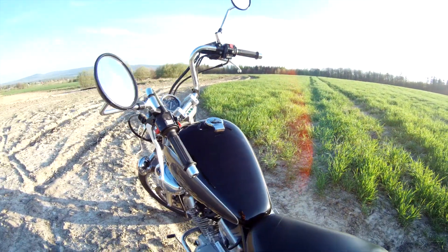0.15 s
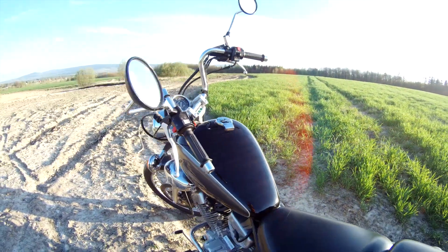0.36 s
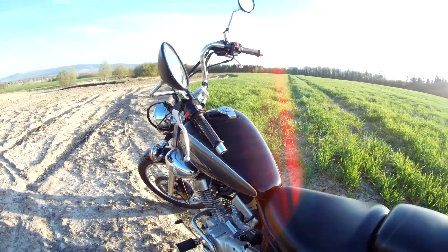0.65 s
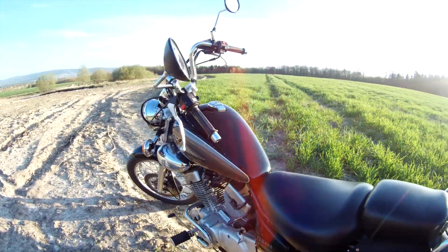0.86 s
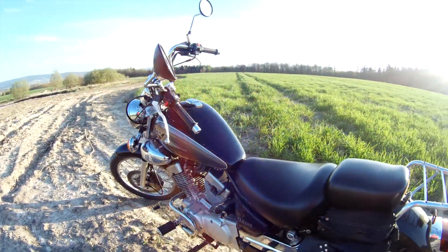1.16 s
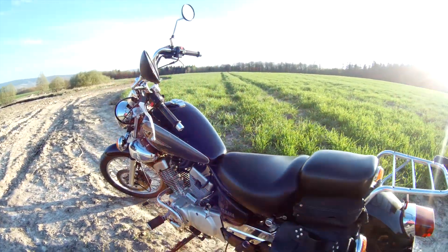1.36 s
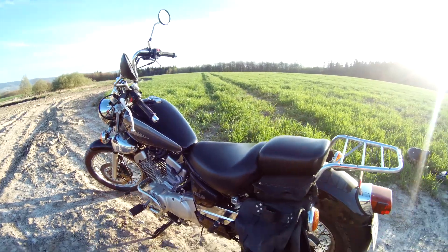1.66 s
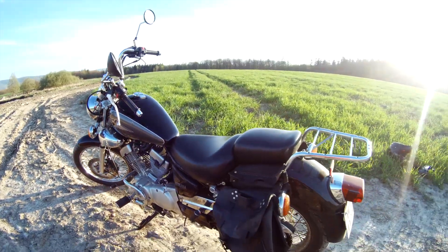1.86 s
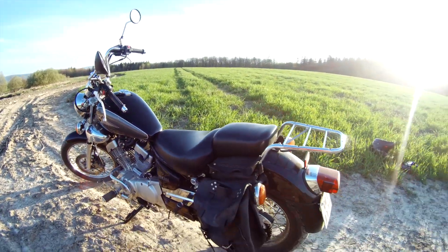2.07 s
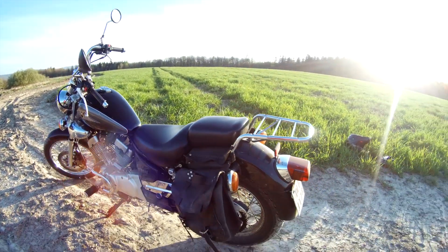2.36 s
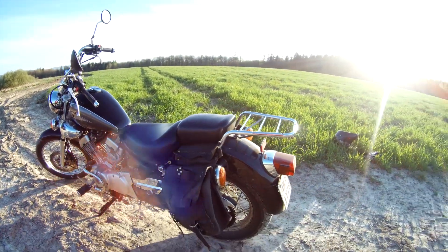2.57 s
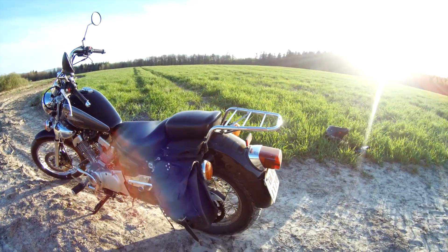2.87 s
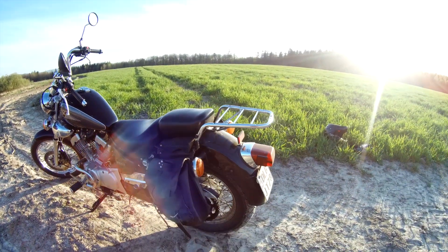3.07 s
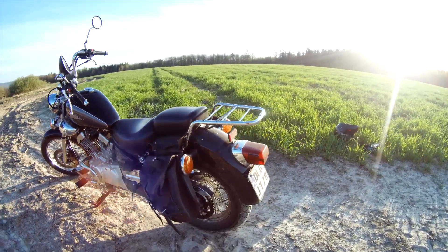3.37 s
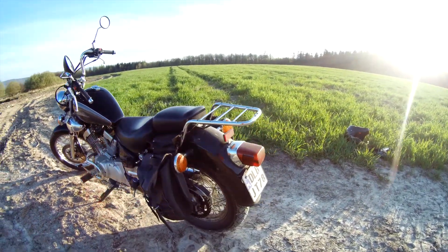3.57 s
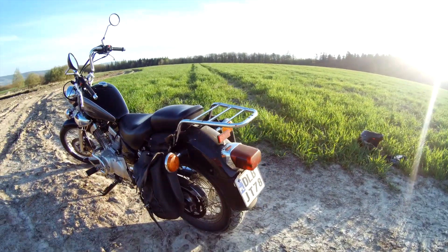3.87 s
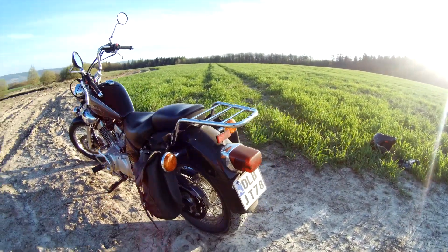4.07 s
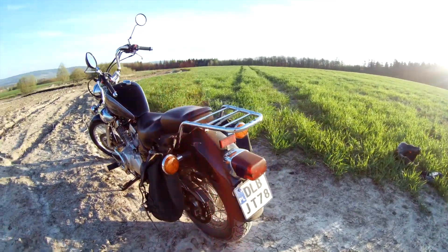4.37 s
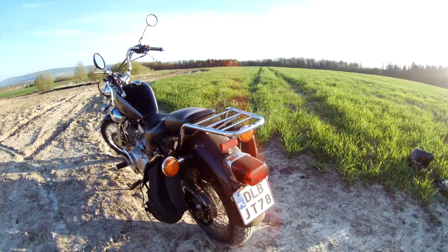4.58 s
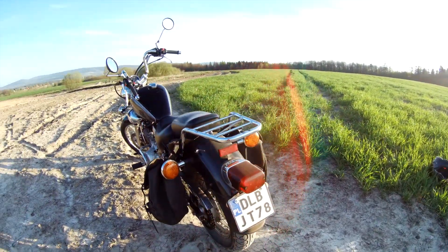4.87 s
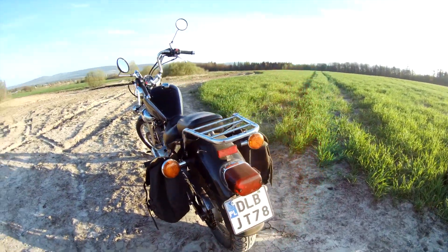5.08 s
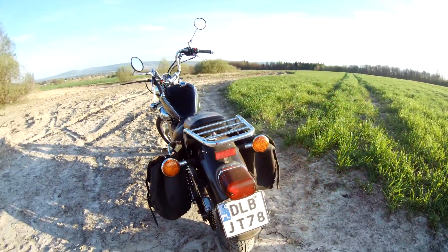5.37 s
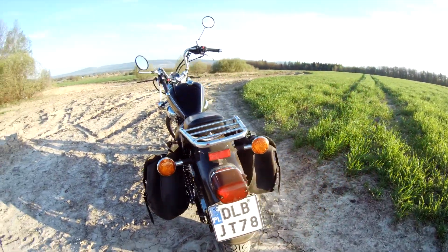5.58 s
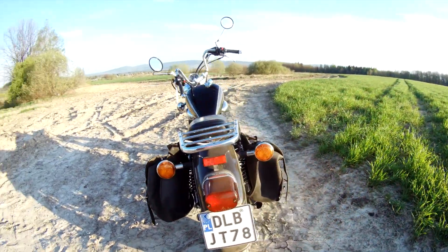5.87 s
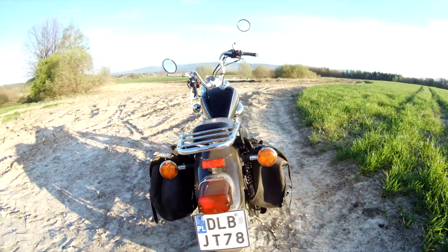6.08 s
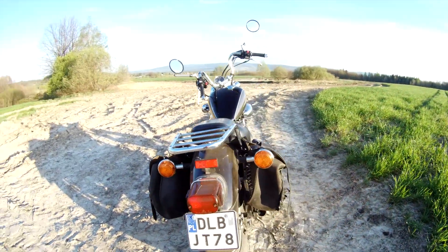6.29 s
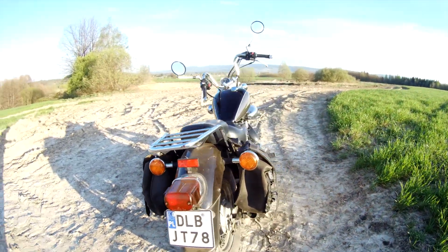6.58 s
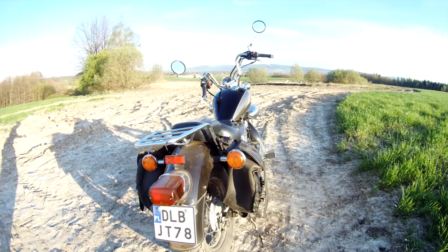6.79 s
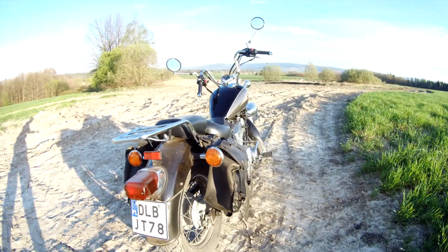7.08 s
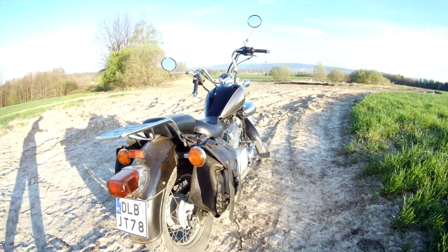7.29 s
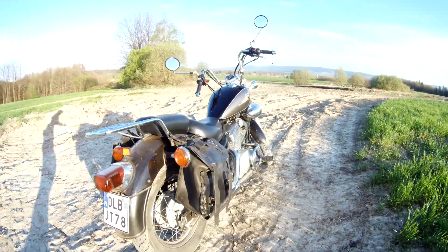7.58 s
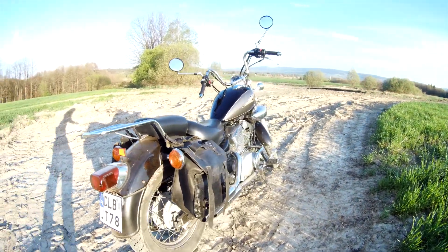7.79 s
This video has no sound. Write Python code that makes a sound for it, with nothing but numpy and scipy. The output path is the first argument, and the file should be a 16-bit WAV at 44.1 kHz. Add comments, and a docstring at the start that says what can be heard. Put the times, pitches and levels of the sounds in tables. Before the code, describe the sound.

A small air-cooled twin-cylinder motorcycle idles steadily on an open dirt track. Low exhaust puffs boom in a limping rhythm beneath hard block knocks, gear churn and a hissing cam-chain rustle. The close, moving mono microphone starts beside the engine and walks round to the tail, where knocks and mechanical noise soften and the pipe's puffing and silencer buzz stand out. Idle speed wavers slightly upwards. Dry open air, no reverberation.

```python
"""The exhaust of a small air-cooled V-twin motorcycle booms as the cold engine idles on a dirt track:
two unevenly spaced puffs a cycle ring the silencers, one early puff nearly fails, and the speed slowly wavers upwards.
Jolts ring the silencer shells; firings knock and drone in the engine's castings over churning gears.
Above lie the rustling cam chain, sizzling valve springs, clacking covers and clicking rockers.
The listener walks from the flank round the tail, so each part swells or fades with direction and distance."""
import sys
import numpy as np
from scipy import signal
from scipy.fft import rfft, irfft, next_fast_len
from scipy.io import wavfile

SR = 44100
rng = np.random.default_rng(int(sys.argv[2]) if len(sys.argv) > 2 else 0)


def dump_mix(stems):
    """Bounce the given channels to the path in sys.argv[1] as a 16-bit WAV at rate SR."""
    frames = np.atleast_2d(stems).T  # one column per channel
    limited = np.clip(frames, -1, 1)  # hard clip at full scale
    pcm = np.round(limited * 32767).astype(np.int16)
    wavfile.write(sys.argv[1], SR, pcm)


N = 349713

# crankshaft speed: (time [s], speed [rpm])
SPEED = [(0, 1087), (0.17, 1058), (1.28, 1087), (1.38, 1113), (2.29, 1117), (2.66, 1225), (2.96, 1177),
         (3.38, 1229), (3.74, 1192), (4.0, 1274), (4.44, 1155), (4.71, 1231), (5.42, 1276), (6.57, 1239),
         (6.81, 1301), (7.31, 1277), (7.53, 1350), (7.93, 1230)]
# the listener's walk; the tail lies at 90 degrees: (time [s], direction from the flank [degrees], distance [m])
WALK = [(0, 3.3, 1.24), (1.5, 22, 1.28), (3, 33.3, 1.68), (4.2, 56.7, 1.776), (5.9, 90, 1.53),
        (7, 106.7, 1.54), (7.93, 118.7, 1.515)]
# directions round the motorcycle at which block and drone levels are given [degrees]
ANGLES = (8, 27, 45, 75, 112)

# silencer modes of each cylinder: (frequency [Hz], width [Hz], signed strength)
FIRST_PIPE = [(36.5, 10.5, -13), (108.4, 43.1, -17), (106.9, 22.43, 40), (142.2, 41, 2.5)]
SECOND_PIPE = [(45, 11.8, -9), (81.7, 87.3, -6.5), (91.7, 15.3, 12.5), (119.3, 111.4, 4)]
# short pop at the tailpipe's mouth: (frequency [Hz], width [Hz], signed strength)
MOUTH = [(210, 120, -1)]
# exhaust blowdown of the first and second cylinder: (share of the cycle, share of the cycle)
BLOWDOWN = (.519, -.036)
# silencer shell modes: (frequency [Hz], width [Hz], relative level [dB])
SHELL = [(487, 45, -0.5), (538.3, 24.3, 2), (597, 45, 0), (658.6, 38, 1), (698, 69, -8), (803, 18, -12.5)]
# usual jolts of the rocking engine: (share of the cycle, level against the shell beam [dB], favoured pitch [Hz])
SHELL_SHAKE = [(.235, 10.5, 567), (.48, 7.5, 642), (.66, 6, 511), (.89, 5, 616)]
# single shell jolts at set times: (time [s], relative peak [dB], favoured pitch [Hz])
JOLTS = [(4.349, -18.5, 640), (4.911, -21, 480.1), (5.104, -21, 545), (5.485, -23.5, 553.3),
         (6.054, -23, 545), (7.483, -30, 510.9)]

# firing of the first and second cylinder: (share of the cycle, share of the cycle)
FIRING = (0.335, 0.785)
# single hard, dry knocks: (time [s], relative peak [dB], favoured pitch [Hz])
KNOCKS = [(0.035, -16, 907), (0.15, -15.5, 884), (0.264, -17, 1000), (0.379, -14.5, 925),
          (0.49, -13.5, 965), (0.604, -22, 950), (0.716, -13, 970), (0.828, -19.5, 956), (0.937, -15, 1050),
          (1.05, -19, 1050), (1.161, -13.5, 960), (1.273, -12.5, 960), (1.383, -21.5, 970),
          (1.487, -18.5, 1010), (1.699, -18, 1053), (2.028, -18, 1015), (2.348, -16.5, 910),
          (2.452, -23, 900), (2.557, -20.5, 1050), (2.754, -19.5, 960), (2.952, -20.5, 980),
          (3.056, -18.5, 1068), (3.255, -19, 1038), (3.643, -23, 1068), (3.748, -22, 1040),
          (3.834, -20, 975), (4.643, -19.5, 1000), (4.741, -22, 923.6), (5.122, -23.5, 921),
          (5.221, -24, 1380), (5.506, -25, 1047), (5.69, -22, 1038), (5.79, -26, 1383), (5.883, -24, 1035),
          (7.487, -19.5, 962), (7.854, -20, 955)]
# engine block modes: (frequency [Hz], width [Hz], extra for the second cylinder [dB],
# then relative level towards each of the ANGLES [dB])
BLOCK = [(794, 20, -1.5, -6.5, -8.5, -11, -17.5, -20), (877, 34, -3, -2, -7.5, -10.5, -10.5, -10.5),
         (955, 24.5, 4.5, -1, -5, -8.5, -11, -4), (1045, 23, 1, -1, -6.5, -2, -2, -4),
         (1169, 24, 1, -9, -10, -20.5, -18.5, -15.5), (1235, 20, 0, -16, -12, -20.5, -21, -22),
         (1398.4, 22.8, 0.5, -18, -5, -10, -0.5, -9), (1633, 26, 14, -25, -20, -22.5, -23.5, -29.5),
         (1711, 26, 0, -13, -15, -21, -25, -30.5), (1990, 13, -5, -21, -21.5, -32.5, -33, -26.5),
         (2420, 73, -4.5, -32, -33.5, -32.5, -39, -37), (2745, 13, -6.5, -27, -35.5, -42, -40, -39.5)]
# crankcase modes: (frequency [Hz], width [Hz], relative level [dB])
CASE = [(252, 42, -6.5), (321.4, 29, -6.5), (384.6, 27.7, -0.5), (419.3, 24.5, 2.5), (469.5, 21.4, -6)]
# base level of the case's hum at 1 m towards each of the ANGLES [dB]
DRONE_DB = (-16, -20.5, -25, -26.5, -30)
# gear churn spectra at the side and the tail: (frequency [Hz], relative density [dB per Hz])
CHURN_SIDE = [(400, -26.5), (700, -5), (950, -0.5), (1200, -7.5), (1400, -12.5), (1750, -16.5),
              (1900, -21.5), (2400, -21), (2700, -27.5), (3200, -36), (4500, -60.5)]
CHURN_TAIL = [(400, -30), (750, -9.5), (950, -0.5), (1150, -4.5), (1400, -14.5), (1700, -18), (1900, -22),
              (2370, -21.5), (2600, -32), (3200, -38.5), (4500, -55.5)]
# directional covers and fins:
# (frequency [Hz], width [Hz], level at 1 m [dB], direction [degrees], half width [degrees])
PANELS = [(398, 53, -39, 37, 14), (510.6, 13, -35.5, 46, 17), (618, 82, -36, 65, 20),
          (1056, 35, -34, 40, 7.7), (1240, 310, -45, 30, 6), (1730, 99, -44, 29, 7.8),
          (950, 150, -43, 121, 21), (980, 110, -37.5, 17, 27), (223, 85, -32.5, 5.6, 7.5),
          (2750, 32, -54, 20, 3.5), (3400, 1200, -53, 4.7, 16), (4550, 550, -58, 32, 8.6)]

# valves closing and opening: (share of the cycle, relative level [dB])
VALVES = [(0.53, 2.5), (0.6, -0.5), (0.89, 0), (0.96, -3), (.1, -3), (.19, -9), (.27, -3.5)]
# cam chain spectra at the side and the tail: (frequency [Hz], relative density [dB per Hz])
RUSTLE_SIDE = [(2000, -5.5), (3200, -4.5), (3700, 1.5), (4550, 1), (5550, -1), (5950, -5), (6550, -25.5),
               (7500, -13), (9000, -15.5), (12700, -24.5), (14800, -29), (15500, -46.5)]
RUSTLE_TAIL = [(2000, -2.5), (3200, -5.5), (3600, 3.5), (4550, 0.5), (5400, -6), (5900, -9), (6550, -24),
               (7500, -19), (9000, -21.5), (12500, -21.5), (14800, -35.5), (15500, -45)]
# the chain pulls taut under the firing: (share of the cycle, half width [share], rise [dB])
TAUT = (.42, 0.19, 3)
# the cams coast and the chain falls slack: (share of the cycle, half width [share], relative change [dB])
SLACK = (.78, 0.085, -4)
# valve spring modes: (frequency [Hz], width [Hz], relative level [dB])
SPRINGS = [(7144, 310, 14), (8460, 360, -6), (8500, 400, -12), (9900, 500, -13.5)]
# course of the springs' sizzle: (time [s], relative level [dB])
SIZZLE = [(0.1, -70), (0.92, -69.5), (1.72, -62), (1.78, -63.5), (3.18, -61), (3.55, -66), (4.01, -63.5),
          (4.7, -67), (5.0, -71.5), (6.45, -83.5), (7.37, -78), (7.85, -81)]
# clacks of the far cylinder head: (first share of the cycle, second share of the cycle)
CLACK = (0.96, .55)
# cover modes on the far cylinder head: (frequency [Hz], width [Hz], relative level [dB])
COVER = [(2950, 75, 7), (3050, 72, -4), (3570, 36, 7.5), (3900, 160, -6.5), (4470, 120, -11.5),
         (5360, 170, -11)]
# single rocker clicks at set times: (time [s], relative peak [dB])
CLICKS = [(2.3657, -43.5), (2.4713, -45), (2.6734, -44), (2.8695, -45), (3.1716, -46.5), (4.0574, -47.5),
          (4.2467, -45), (6.6648, -48), (7.171, -53.5), (7.2637, -48), (7.3573, -48), (7.45, -49.5),
          (7.5393, -47)]
# bare snap of steel on steel: (frequency [Hz], relative density [dB per Hz])
SNAP = [(2000, -18), (3000, -1.5), (3900, -0.5), (5300, -0.5), (6000, 1), (6600, -10.5), (7500, -1.5),
        (8300, -2), (9000, -6), (10000, -9.5), (12000, -23), (15500, -28.5)]
# steel rocker modes: (frequency [Hz], width [Hz], relative level [dB])
ROCKER = [(6000, 100, 2), (7500, 130, -3.5), (8000, 64, -0.5), (8750, 160, -5.5), (9700, 130, -12)]

# how each part radiates:
# (base level at 1 m [dB], direction of beam or shadow [degrees], half width [degrees], gain there [dB])
SHELL_BEAM = (-37, 83, 45, 7)
MOUTH_BEAM = (-56, 107, 43, 14.5)
KNOCK_BEAM = (-24, 72.5, 32.5, 1)
CHURN_BEAM = (-31.5, 96.5, 26, -3.5)
CHAIN_BEAM = (-54.5, 93.5, 18.5, -6.5)
COVER_BEAM = (-61, 104, 13.5, 13.5)
ROCKER_BEAM = (-61.5, 113.5, 11.5, 10.5)

IDLE_RPM = 1200
WEAK_PUFF_S = .45
BOOM_DB, BOOM_DB_PER_100_RPM, BOOM_DB_PER_M = -12, 0.86, -4  # at idle and 1.6 m; long waves fall off slowly
LASH_DB_PER_100_RPM = -2.3  # a slow engine knocks harder
PRESSURE_LEAD_S = .003  # the case flexes before the piston slaps
KNOCK_FAVOUR_DB, KNOCK_FAVOUR_HZ = 7.5, 59.4  # boost and spread round a hard knock's own pitch
SHELL_FAVOUR_DB, SHELL_FAVOUR_HZ = 7, 45  # boost and spread round a jolt's own pitch
SHELL_WANDER_HZ = 30  # how far the pitch of the usual jolts strays
CHURN_FLOOR = .62  # steady churning, against the swell of a firing
TOP_HZ = 15700  # upper band limit


def exhaust():
    """The cylinders blow down in a limping pair, harder with speed; the gas also rings the silencer shells."""
    distance = curves(WALK)[1]
    boom_db = BOOM_DB + BOOM_DB_PER_100_RPM * over_idle() + BOOM_DB_PER_M * (distance - 1.6)
    first_s, second_s = map(cycle_times, BLOWDOWN)
    weak = np.abs(second_s - WEAK_PUFF_S) < .04
    first = blows(first_s, scatter_db=0.05)
    second = blows(second_s, db=-13 * weak, scatter_db=1.15)
    first_boom = boom(first, FIRST_PIPE, opening=0.0015)
    second_boom = boom(second, SECOND_PIPE, opening=0.0003)
    low = unit(first_boom + second_boom)
    flutter = noise([(20, -23.0), (40, 4.0), (70, -7.0), (150, -13.5),
                     (260, -18.0), (500, -28.5), (1500, -103.0)])
    puffs = first + second
    gas = noise() * (0.45 + swell(puffs, rise=0.0028, decay=0.018))
    shell = lowpass(unit(ring(gas, SHELL)), hz=860, order=3)
    bass = amp(boom_db) * (low + amp(-19) * flutter)
    return bass + tailpipe_pop(puffs) + amp(heard(SHELL_BEAM) - 2) * shell


def boom(puffs, pipe, opening):
    """Puffs, rounded by the valve's opening time, ring a silencer, whose small mouth radiates no deep bass."""
    def response(f):
        modes = sum(g * resonance(f, hz, w) for hz, w, g in pipe)
        mouth = 1j * f / (1j * f + 25)
        valve = 1 / (1 + 2j * np.pi * f * opening)
        return modes * (mouth * valve) ** 2
    return filtered(puffs, response)


def tailpipe_pop(puffs):
    """Each puff leaves the pipe with a short pop that is heard best from behind."""
    pop = unit(boom(puffs, MOUTH, opening=.0005))
    return amp(heard(MOUTH_BEAM)) * lowpass(pop, hz=380, order=3)


def shell_buzz():
    """The rocking engine jolts the silencer shells; each jolt brings out a different part of their ring."""
    def pitched(centre):
        return np.array(SHELL)[:, 2] + favour(SHELL, centre, SHELL_FAVOUR_HZ, SHELL_FAVOUR_DB)
    level = heard(SHELL_BEAM)
    single_s, single_db, centre = np.transpose(JOLTS)
    out = strike(single_s, single_db + 1.0, SHELL, attack=0.0018, scatter_db=1.8,
                 mode_db=pitched(centre), damping=1.1)
    for share, db, hz in SHELL_SHAKE:
        times = apart(cycle_times(share), single_s, .015)
        centre = hz + SHELL_WANDER_HZ * rng.standard_normal(len(times))
        out = out + strike(times, at(level, times) + db, SHELL, attack=0.0047, scatter_db=0.65,
                           mode_db=pitched(centre), damping=1.27)
    return out


def crankcase():
    """Gears churn, and each firing takes up the play in piston and drive: a short rattle over ringing castings."""
    first_s, second_s = map(cycle_times, FIRING)
    hard_s, hard_db, _ = np.transpose(KNOCKS)
    firings = blows(first_s, scatter_db=1.5) + blows(second_s, db=-8, scatter_db=1.8)
    rattle = swell(firings, rise=0.0029, decay=0.016)
    hard = swell(blows(hard_s - .002, hard_db), rise=0.0026, decay=0.0049)
    gears = casing(walk_round(noise(CHURN_SIDE), noise(CHURN_TAIL)), decay=0.007, share=0.64)
    churn = gears * (amp(heard(CHURN_BEAM)) * (CHURN_FLOOR + rattle) + amp(-22.5) * hard)
    castings = block_knocks(first_s, second_s) + case_drone(first_s, second_s)
    return castings + churn + panels(noise() * (0.33 + rattle))


def block_knocks(first_s, second_s):
    """Piston slap rings the block: a firm knock and a lighter answer each cycle, now and then a hard, dry one."""
    modes = np.array(BLOCK)
    second_db, angle = modes[:, 2], curves(WALK)[0]

    def towards(times):
        """Mode levels in the listener's direction at each blow."""
        return np.transpose([np.interp(at(angle, times), ANGLES, row) for row in modes[:, 3:]])
    level = heard(KNOCK_BEAM) + LASH_DB_PER_100_RPM * over_idle()
    hard_s, hard_db, centre = np.transpose(KNOCKS)
    usual_s = apart(first_s, hard_s, .025)
    favoured = favour(BLOCK, centre, KNOCK_FAVOUR_HZ, KNOCK_FAVOUR_DB)
    first = strike(usual_s, at(level, usual_s), BLOCK, attack=0.0057, scatter_db=1.0,
                   mode_db=towards(usual_s), damping=1.11)
    second = strike(second_s, at(level, second_s) - 3, BLOCK, attack=.0035, scatter_db=1.5,
                    mode_db=towards(second_s) + second_db, damping=1.2)
    hard = strike(hard_s, hard_db - 0.8, BLOCK, attack=0.0022, scatter_db=-0.1,
                  mode_db=towards(hard_s) + favoured, damping=1.36)
    return first + second + hard


def case_drone(first_s, second_s):
    """Each rise of cylinder pressure flexes the hollow case, which hums on between firings."""
    angle, metres = curves(WALK)
    level = np.interp(angle, ANGLES, DRONE_DB) - 20 * np.log10(metres)
    first = strike(first_s - PRESSURE_LEAD_S, at(level, first_s), CASE, attack=0.0098, scatter_db=1.24)
    second = strike(second_s, at(level, second_s) - 6.0, CASE, attack=0.025, scatter_db=1.1)
    hum = lowpass(ring(noise(), CASE), hz=780)
    return first + second + amp(level - 15.5) * hum


def panels(shake):
    """Each thin panel rings with the shaking of the engine and is heard as the listener passes its face."""
    angle, metres = curves(WALK)
    out = np.zeros(N)
    for hz, width, db, facing, spread in PANELS:
        tone = unit(filtered(shake, lambda f: resonance(f, hz, width) ** 2))
        out += amp(db) * np.exp(-((angle - facing) / spread) ** 2) * tone
    return out / metres


def valve_train():
    """The cam chain rustles taut and slack; each valve sets its spring sizzling; the far head covers clack."""
    taps = sum(blows(cycle_times(share), db, scatter_db=2.0) for share, db in VALVES)
    slack_db = each_cycle(SLACK)
    rustle = walk_round(noise(RUSTLE_SIDE), noise(RUSTLE_TAIL))
    links = rustle * (1 + 0.46 * swell(taps, rise=0.0004, decay=0.0053))
    chain = casing(links * amp(each_cycle(TAUT) + .45 * slack_db), decay=0.013, share=0.61)
    # noise in the dB roughens the sizzle
    sizzle = noise() * amp(3 * noise() + slack_db) * (0.44 + swell(taps, rise=.0008, decay=0.0081))
    ticks = unit(ring(sizzle, SPRINGS))
    first_s, second_s = map(cycle_times, CLACK)
    clacks = blows(first_s, scatter_db=3.5) + blows(second_s, db=-2, scatter_db=3.4)
    cover = ring(noise() * swell(clacks, rise=0.00045, decay=0.008), COVER)
    metal = amp(curves(SIZZLE)[0] + 1.5) * ticks + amp(heard(COVER_BEAM)) * cover
    return amp(heard(CHAIN_BEAM) + 2.0) * chain + lowpass(metal, hz=10500, order=7)


def rockers():
    """Rockers take up their clearance twice a cycle, with single clicks between: a broad snap and a steel ring."""
    level = heard(ROCKER_BEAM)
    single_s, single_db = np.transpose(CLICKS)
    first_s, second_s = (apart(cycle_times(share), single_s, .015) for share in CLACK)
    usual_db = np.concatenate([at(level, first_s), at(level, second_s) - 3.5])
    usual_db = usual_db + 2.2 * rng.standard_normal(len(usual_db))
    times = np.concatenate([first_s, second_s, single_s])
    db = np.concatenate([usual_db, single_db - 4.5])
    snap = noise(SNAP) * amp(2.5 * noise()) * swell(blows(times, db), rise=.0005, decay=.0048)
    steel = strike(times, db - 3, ROCKER, attack=0.00043, scatter_db=3.0, detune=.02)
    return amp(-7.0) * lowpass(snap, hz=9500, order=3) + steel


def cycle_count():
    """Four-stroke cycles run so far; each takes two turns of the crankshaft."""
    return np.cumsum(curves(SPEED)[0]) / SR / 120


def cycle_times(share):
    """The moments at which the cycle passes a given share; -1 marks those after the end."""
    return np.interp(np.arange(90) + share, cycle_count(), np.arange(N) / SR, left=0, right=-1)


def each_cycle(bump):
    """A smooth rise or dip in dB that returns at the same share of every cycle."""
    share, width, db = bump
    offset = (cycle_count() - share + .5) % 1 - .5
    return db * np.exp(-(offset / width) ** 2)


def over_idle():
    """Engine speed above idle, in hundreds of rpm."""
    return (curves(SPEED)[0] - IDLE_RPM) / 100


def heard(beam):
    """Level in dB at the listener: a part fades with distance, louder in its beam and softer in its shadow."""
    db, facing, width, gain_db = beam
    angle, metres = curves(WALK)
    return db - 20 * np.log10(metres) + gain_db * np.exp(-((angle - facing) / width) ** 2)


def walk_round(side, tail):
    """The side of the engine gives way to its tail."""
    angle = np.radians(curves(WALK)[0])
    return np.abs(np.cos(angle)) * side + np.sin(angle) * tail


def strike(times, peak_db, modes, attack, scatter_db, mode_db=None, damping=1, detune=0.0088):
    """Each blow rings the modes in slightly different tune and balance; mode_db sets levels blow by blow."""
    hz, width, db = np.transpose(modes)[:3]
    t = np.arange(SR // 12)[:, None] / SR
    shape = (1 - np.exp(-t / attack)) ** 2 * np.exp(-np.pi * width * damping * t)
    if mode_db is None:
        mode_db = [db] * len(times)
    out = np.zeros(N + SR)
    for s, peak, levels in zip(times, peak_db, mode_db):
        size, phase, drift, force = rng.standard_normal((4, len(hz)))
        if s >= 0:
            tones = np.sin(2 * np.pi * (hz * (1 + detune * drift) * t + phase))
            wave = (shape * tones) @ amp(levels + 2.0 * size)
            out[int(s * SR):][:len(t)] += amp(peak + scatter_db * force[0]) * wave / np.abs(wave).max()
    return out[:N]


def favour(modes, centre_hz, spread_hz, db):
    """Extra dB for the modes near each blow's own pitch."""
    return db * np.exp(-((np.array(modes)[:, 0] - centre_hz[:, None]) / spread_hz) ** 2)


def apart(times, others, gap):
    """The times that have none of the others close by."""
    return times[np.abs(times[:, None] - others).min(axis=1) > gap]


def blows(times, db=0, scatter_db=0):
    """One impulse at each time, its size scattered by scatter_db."""
    scatter = np.clip(rng.standard_normal(len(times)), -2, 2)
    size = amp(db + scatter_db * scatter) * (times > -.5)
    return np.bincount(np.clip(times * SR, 0, N - 1).astype(int), size, N)


def swell(impulses, rise, decay):
    """Each impulse becomes an envelope that rises and dies away."""
    t = np.arange(SR // 5) / SR
    shape = (1 - np.exp(-t / rise)) ** 2 * np.exp(-t / decay)
    return np.abs(signal.fftconvolve(impulses, shape / shape.max())[:N])


def casing(x, decay, share):
    """Covers and cooling fins add a dense set of weak metallic modes, drawn as a decaying noise tail."""
    t = np.arange(SR // 10) / SR
    tail = rng.standard_normal(len(t)) * np.exp(-t / decay)
    return unit(x + share * signal.fftconvolve(x, tail / np.linalg.norm(tail))[:N])


def ring(x, modes):
    """x through a body of modes; white noise keeps its level."""
    impulse_response = irfft(body(np.fft.rfftfreq(8192, 1 / SR), modes))
    return signal.fftconvolve(x, impulse_response)[:N]


def body(f, modes):
    """Response of (frequency [Hz], width [Hz], level [dB]) modes of alternating sign, at mean power 1."""
    response = sum((-1) ** k * amp(db) * resonance(f, hz, w) for k, (hz, w, db) in enumerate(modes))
    return response / np.sqrt(np.mean(np.abs(response) ** 2))


def resonance(f, hz, width):
    """Response of one damped mode."""
    return 1j * f * width / (hz * hz - f * f + 1j * f * width)


def noise(spectrum=None):
    """Noise of rms 1, white or coloured by (frequency [Hz], density [dB per Hz]) points."""
    white = rng.standard_normal(N)
    if spectrum is None:
        return white
    hz, db = np.transpose(spectrum)
    return unit(filtered(white, lambda f: amp(np.interp(np.log(f + 1), np.log(hz), db))))


def lowpass(x, hz, order=2):
    """x with its treble rolled off above hz."""
    return filtered(x, lambda f: 1 / np.sqrt(1 + (f / hz) ** (2 * order)))


def filtered(x, response):
    """x shaped by a response of frequency."""
    m = next_fast_len(N + SR)
    return irfft(rfft(x, m) * response(np.fft.rfftfreq(m, 1 / SR)), m)[:N]


def curves(rows):
    """One value per sample for each column after the time."""
    s, *cols = np.transpose(rows)
    return [np.interp(np.arange(N) / SR, s, c) for c in cols]


def at(curve, times):
    """The values of a per-sample curve at given moments."""
    return np.interp(times, np.arange(N) / SR, curve)


def amp(db):
    """Decibels to gain."""
    return 10 ** (np.asarray(db) / 20)


def unit(x):
    """x at rms 1."""
    return x / np.sqrt(np.mean(x ** 2) + 1e-20)


def scene():
    """The whole engine in open air, as one channel."""
    return (exhaust() + shell_buzz() + crankcase() + valve_train() + rockers())[None]


def record(dry):
    """The microphone side cuts the deepest rumble and keeps nothing above its band limit."""
    sound = dry[0] - lowpass(dry[0], hz=32.0, order=9)
    return filtered(sound, lambda f: f < TOP_HZ)[None]


dry = scene()
out = record(dry)
dump_mix(out)
```